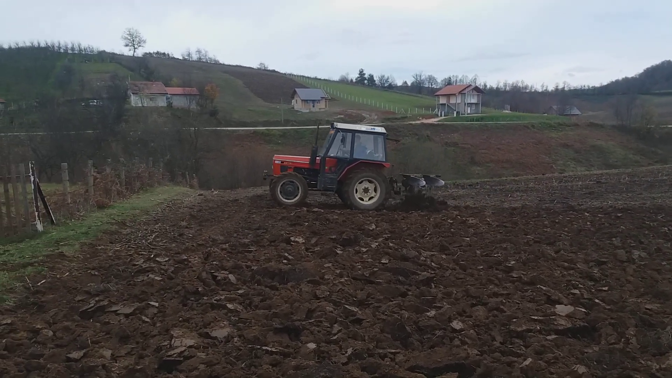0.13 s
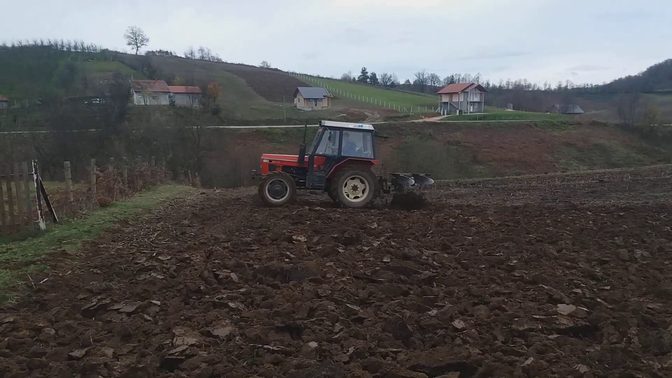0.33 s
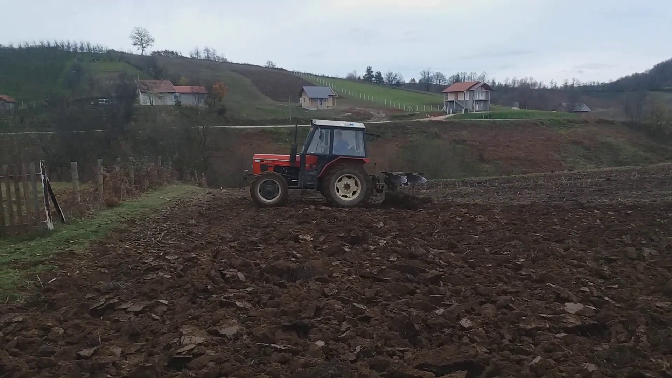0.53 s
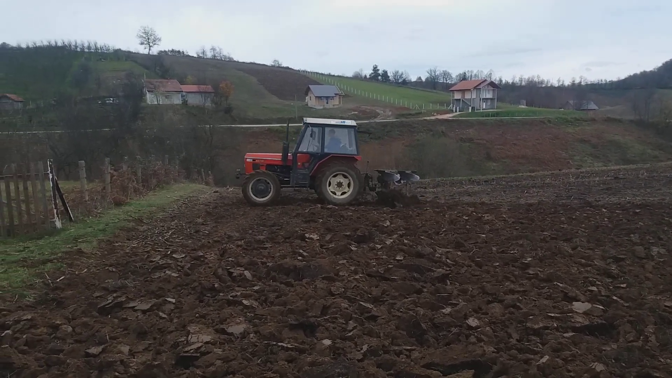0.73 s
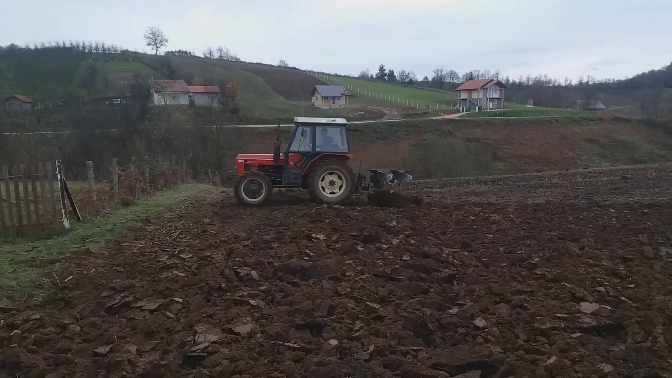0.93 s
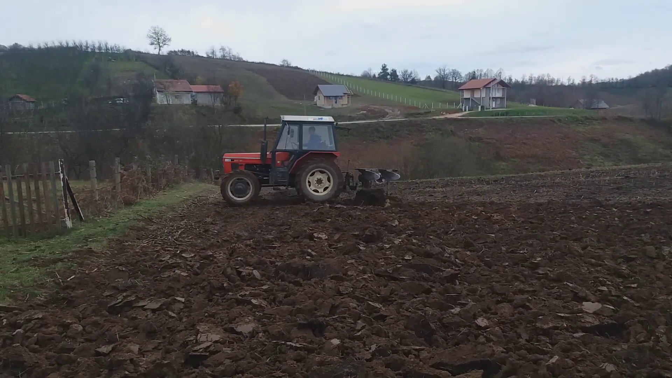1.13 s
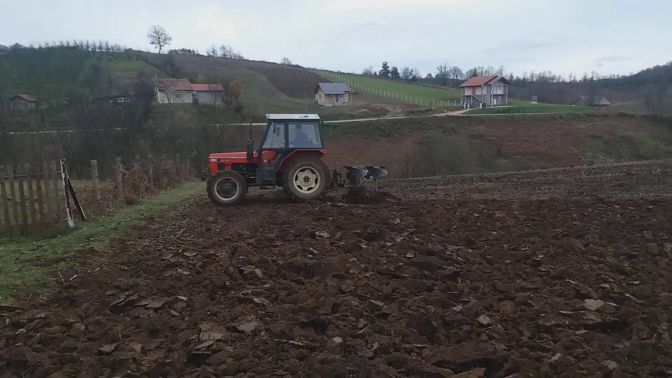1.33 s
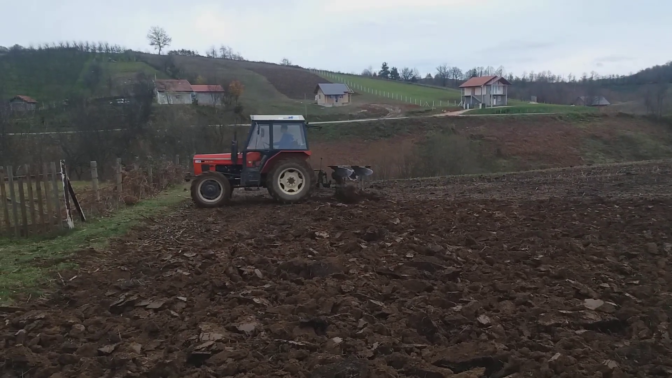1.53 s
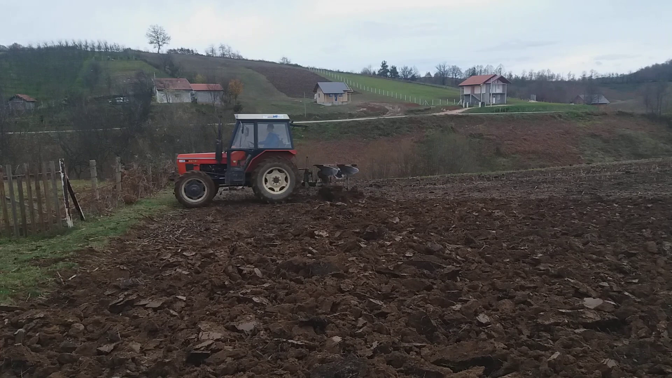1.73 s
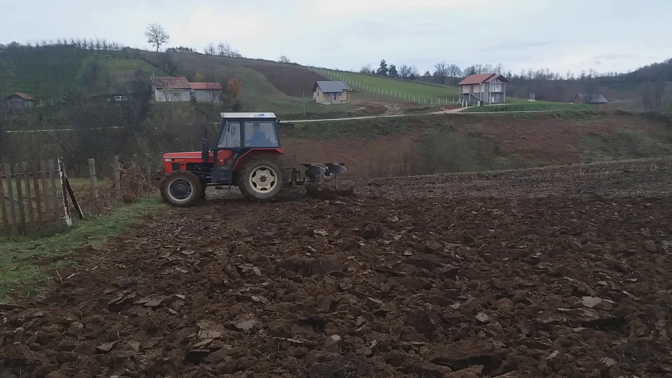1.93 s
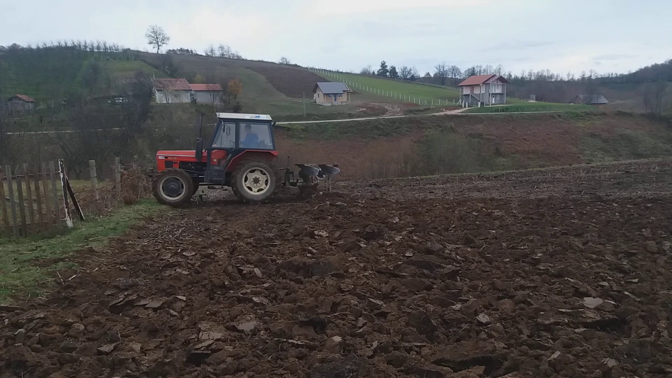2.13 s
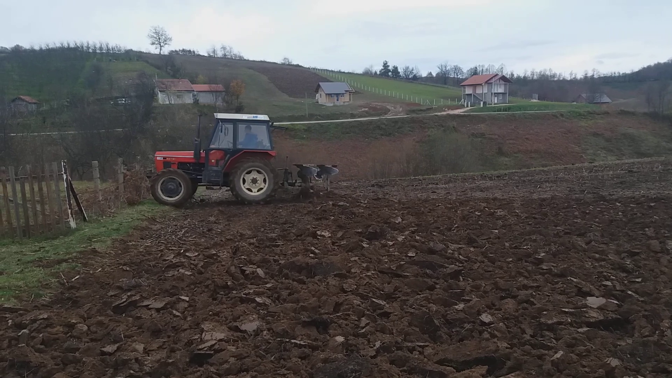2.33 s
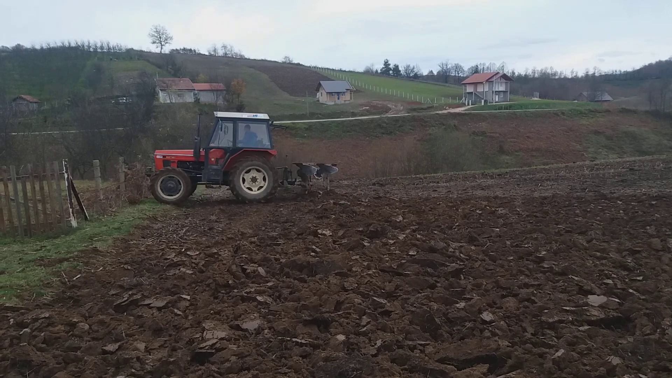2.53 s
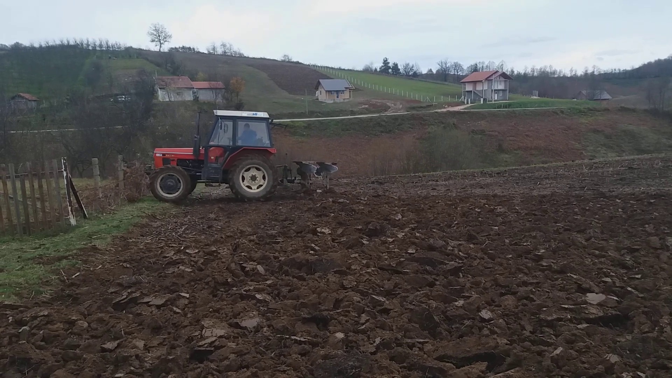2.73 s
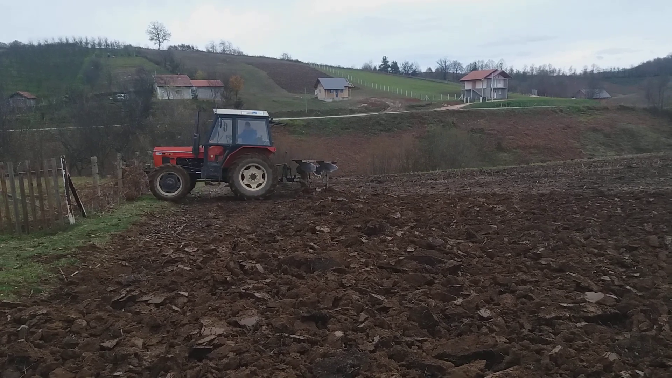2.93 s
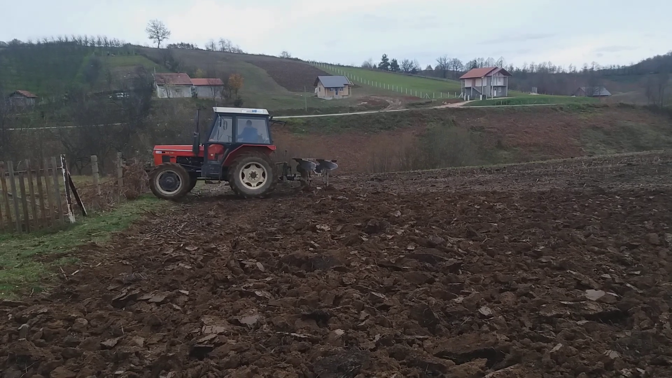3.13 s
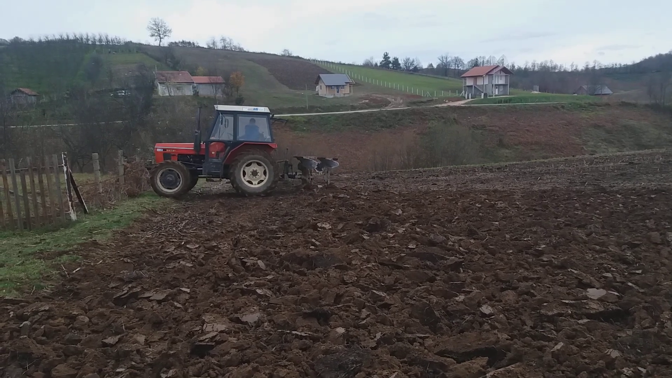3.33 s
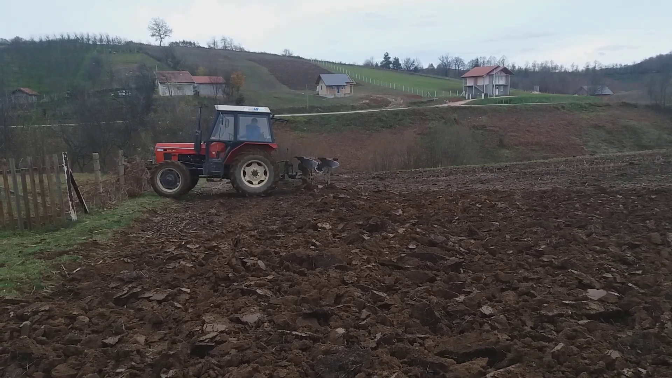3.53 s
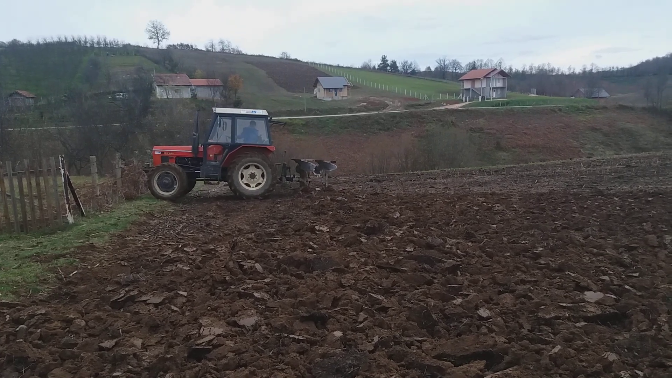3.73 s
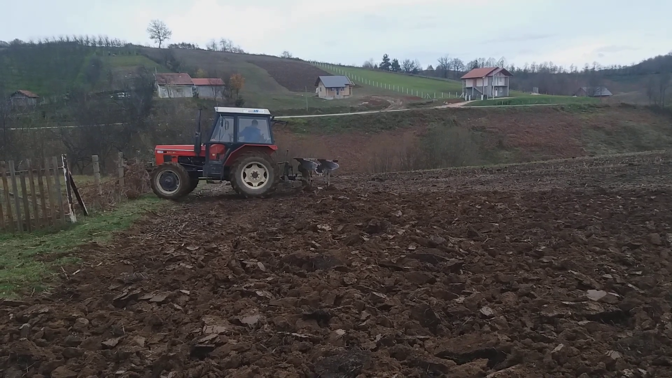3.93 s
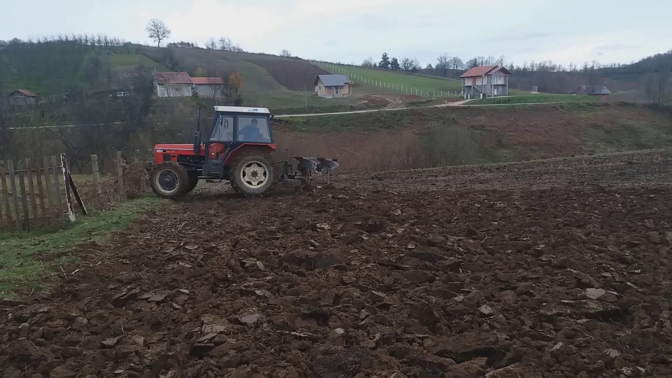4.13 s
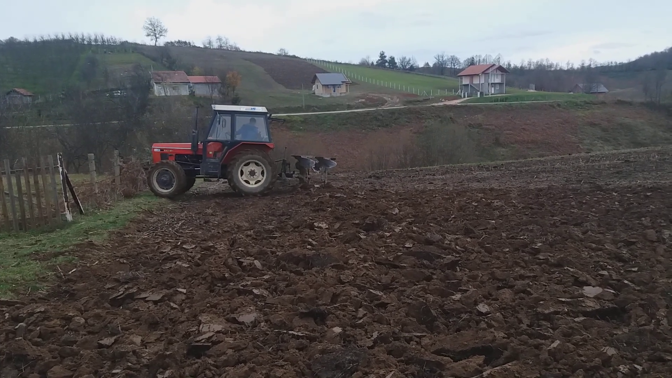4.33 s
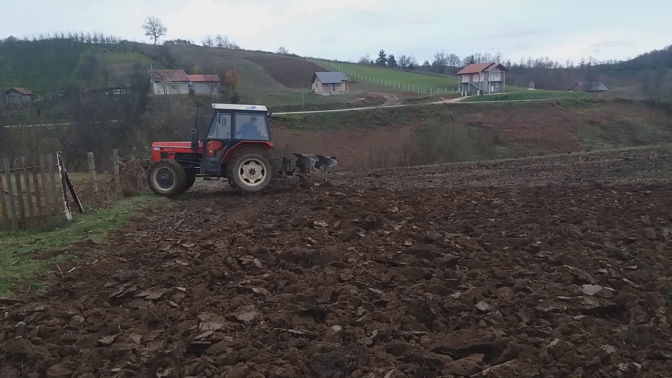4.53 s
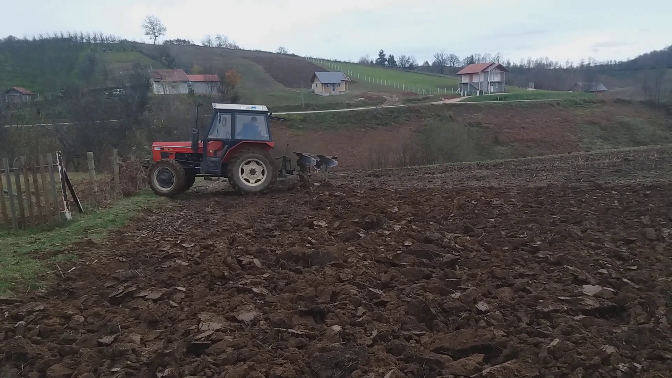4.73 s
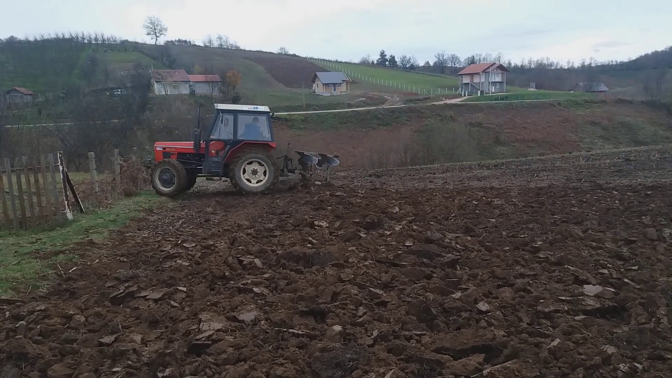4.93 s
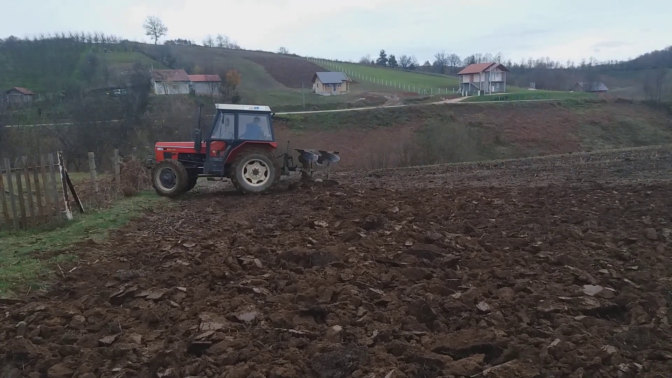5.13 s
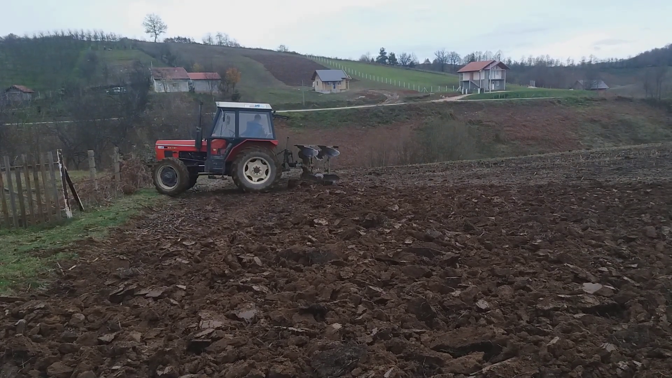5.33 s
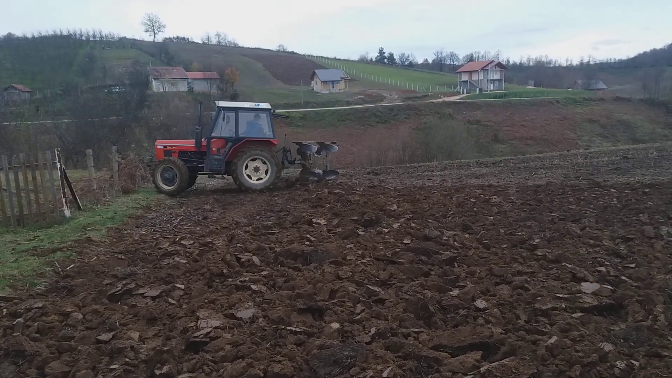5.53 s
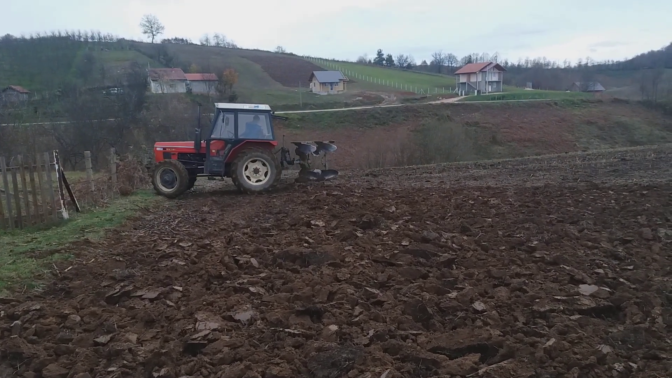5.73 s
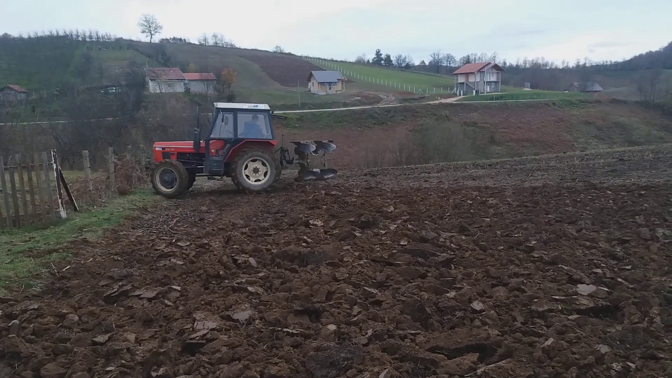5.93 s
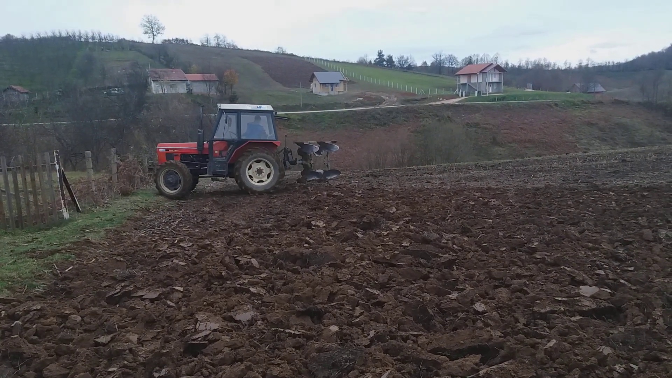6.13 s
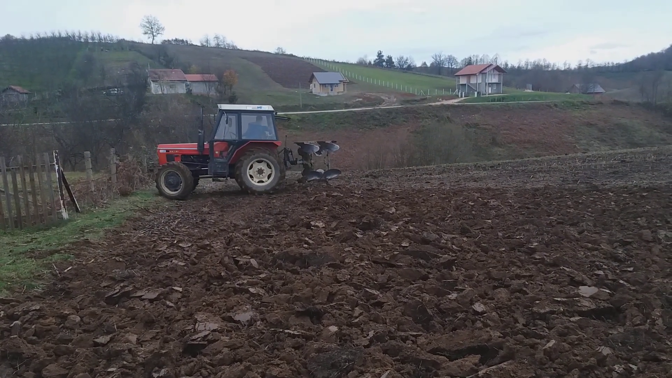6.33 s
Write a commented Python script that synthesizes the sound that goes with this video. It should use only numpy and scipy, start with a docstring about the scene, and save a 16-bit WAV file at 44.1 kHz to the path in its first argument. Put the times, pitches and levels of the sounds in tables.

```python
"""A four-cylinder diesel tractor pulls under load at the end of a furrow, humming and knocking in an open field.
The driver lifts off, the engine runs down to idle and is then revved again.
Sines locked to the crankshaft make the exhaust hum, over a low noise rumble. Knocks, valves and gears excite
resonances of the block. Shaped noise gives the hiss on top; soft thumps and a dry double tick come from the linkage."""
import sys
import numpy as np
from scipy import signal
from scipy.fft import rfft, irfft
from scipy.io import wavfile

SR = 44100
rng = np.random.default_rng(int(sys.argv[2]) if len(sys.argv) > 2 else 0)


def dump_mix(stems):
    """Bounce the given channels to the path in sys.argv[1] as a 16-bit WAV at rate SR."""
    frames = np.atleast_2d(stems).T  # one column per channel
    limited = np.clip(frames, -1, 1)  # hard clip at full scale
    pcm = np.round(limited * 32767).astype(np.int16)
    wavfile.write(sys.argv[1], SR, pcm)


def invert_db(x):
    """Field ratio 10**(x/20) for x, a level in decibels (scalar or array-like)."""
    u = np.asarray(x, float) / 20
    return 10 ** u


N = 282240   # samples, 6.4 s

# Crankshaft speed: t/s, f/Hz (firings per second)
SPEED = [(0.0, 62.35), (0.2, 60.91), (0.4, 61.24), (0.7, 60.21), (1.18, 61.25), (1.29, 62.63),
         (1.59, 63.47), (1.76, 58.06), (2.1, 52.3), (3.3, 37.29), (3.75, 31.39), (4.1, 27.79),
         (4.38, 25.71), (4.48, 27.56), (4.96, 47.37), (5.15, 49.6), (5.35, 49.48), (5.6, 50.54),
         (6.05, 52.14), (6.4, 52.86)]
# Fuel delivered: t/s, share of full (0-1)
FUEL = [(0, 0.77), (.8, 0.94), (1.3, 0.87), (1.6, 0.71), (1.68, 0.15), (3.0, 0.45), (3.3, 0.03),
        (4.1, 0.14), (4.36, 0.72), (4.42, 0.75), (5.02, 0.72), (5.14, 0.3), (5.7, 0.28), (6.0, 0.27),
        (6.4, 0.04)]
# Gear and valve clatter, which other engine noises follow: t/s, relative level/dB
CLATTER = [(0, -24.5), (0.15, -26.5), (0.55, -25.5), (1.3, -24.5), (1.6, -26), (1.68, -31), (2.6, -33.5),
           (3.4, -39), (4.1, -41.5), (4.38, -42), (4.5, -35), (4.8, -29.5), (5.02, -29), (5.12, -33),
           (5.35, -33.5), (5.72, -32), (6.4, -32.5)]

# Exhaust hum: t/s, firing order level/dB, second order level/dB
EXHAUST = [(0.0, -26.5, -40), (0.5, -27, -33), (1.3, -24.5, -31), (1.6, -26, -30.5), (1.7, -36, -35),
           (2.2, -57, -31.5), (3.4, -68, -37.5), (3.6, -74, -42), (4.15, -85, -60), (4.35, -84, -59),
           (4.58, -73, -37.5), (4.8, -50, -36.5), (5.0, -35, -29), (5.2, -44, -39), (5.35, -50, -37.5),
           (5.65, -41, -39.5), (6.4, -41, -35)]
# Third order, set by where it falls on the pipe's resonances: f/Hz, level/dB
THIRD_ORDER = [(78, -44), (95, -41.5), (108, -37.5), (130, -48), (145, -51), (155, -49.5), (185, -42)]
# Weaker orders from uneven cylinders: multiple of the four-firing cycle,
# relative level/dB on full fuel, relative level/dB coasting
UNEVEN_ORDERS = [(5, 1, -70), (6, -6, -3), (7, -4, -15), (9, -16, -14), (10, -10.5, -16), (11, -18, -3),
                 (13, -22, -7.5), (14, -13.5, -20), (15, -6.5, -13.5), (16, -7, -12), (17, -35, -11),
                 (18, -10, -9.5), (19, -8, -13), (20, -3.5, -16), (21, -42, -23), (22, -14, -13.5),
                 (23, -27, -12), (24, -14, -12.5), (26, -7, -27), (28, -23, -11.5), (33, -15.5, -16),
                 (34, -37, -29), (35, -26, -20), (40, -12, -33), (43, -15, -26), (44, -5, -43),
                 (52, -30, -19.5)]
# Bodywork and ground colouring the weaker orders: f/Hz, gain/dB
HUM_COLOUR = [(30, -27), (60, -16), (110, -0.5), (160, -4.5), (230, 1), (310, 1), (400, -3), (480, 1.5),
              (670, 4)]
# Shape of the rumble noise: f/Hz, relative level/dB per Hz
RUMBLE_SPECTRUM = [(18, -53), (30, -33), (43, -45), (67, -10.5), (87, -9), (110, 4), (155, -16), (276, 3.5),
                   (485, -11), (600, -19.5), (780, -57), (1320, -120)]

# Resonances of block and panels: f/Hz, width/Hz, then relative level/dB when knocked,
# under clatter, and when valves seat
BLOCK_MODES = [(617, 256, 4, -21.5, -19), (666.6, 33, 3.5, -24.5, -17.5), (765.7, 13.5, 2, -13.5, -22),
               (845, 400, -2.5, -8.5, -10), (963, 223, -18.5, -15, -8), (1089, 142, -13, -18.5, -6),
               (1208, 260, -27.5, -14.5, -9.5), (1580, 230, 6.5, -20.5, -8.5), (1738, 144, 5, -13.5, -19),
               (1893, 390, -53, -13, -14.5), (2322, 223, 11.5, -13.5, -11.5), (2500, 195, -1.5, -13, -7),
               (2606, 225, 7, -12.5, -32), (2817, 136, 9, -20, -58), (3062, 188, 10.5, -13.5, -16.5),
               (3300, 230, -6.5, -12.5, -41), (3620, 380, -2, -19, -19), (4085, 300, 5, -38, -40),
               (4464, 410, 0, -25.5, -34), (4910, 500, -3, -29.5, -35), (5330, 180, -11, -31.5, -31),
               (5740, 360, -27, -30.5, -31)]
# Knock strength of each cylinder in firing order: relative level/dB
CYLINDER_DB = [-7, -10, -5, -6]
# Valve seating strength of each cylinder in firing order: relative level/dB
VALVE_DB = [-4.0, -1.0, -4.0, 0.5]
# How hard the valves seat against the clatter: t/s, relative level/dB
SEATING = [(0, 0), (1.6, 1.5), (1.8, -4.5), (2.8, -3.5), (4.3, 3.5), (4.7, 2), (5.1, 4), (5.9, 5),
           (6.4, 5.5)]
# Hardest knocks, each ringing the block around one pitch: t/s, relative level/dB, f/Hz
HARD_KNOCKS = [(0.4976, -9, 2820), (0.5611, -8, 2800), (0.6302, -8, 3170), (0.6826, -9, 2370),
               (0.7608, -3, 2560), (0.8104, -2, 2710), (0.8777, -3, 2850), (0.964, -5, 3000),
               (1.073, -6.5, 2280), (1.2058, -8, 2500), (1.222, -1, 3060), (1.27, -3.5, 2900),
               (1.2852, -1.5, 2940), (1.352, -7, 3060), (1.508, -6, 2440), (2.3347, -13.5, 1740),
               (2.4965, -20.5, 3070), (4.409, -19.5, 2480), (4.4493, -19, 3550), (4.522, -14, 2350),
               (4.5875, -15, 2440), (4.6195, -17, 2500), (4.6734, -11.5, 3020), (4.7817, -10.5, 3060),
               (4.8533, -11, 1710), (4.8787, -8, 1720), (4.9667, -13, 1600), (5.006, -12, 1580),
               (5.6897, -8, 990), (5.765, -9, 1000), (5.84, -23, 2500)]

# Treble hiss: t/s, relative level/dB
HISS_LEVEL = [(0, -46), (.75, -42), (1.3, -42.5), (1.6, -53), (1.75, -53), (2.85, -51), (3.1, -64),
              (4.4, -61.5), (4.5, -50.5), (5.3, -46.5), (6.4, -45)]
# Shape of the steady hiss: f/Hz, relative level/dB per Hz
HISS_SPECTRUM = [(4500, -8), (5500, -5.5), (6300, -3.5), (7200, -7.5), (8100, -16.5), (8800, -12),
                 (9700, 1), (10500, 1.5), (11000, -2.5), (12100, -7), (13400, -17), (14200, -17),
                 (15000, -5.5), (15700, -7.5)]
# Whining bands in the hiss: f/Hz, width/Hz, relative level/dB
WHINE_BANDS = [(6670, 97, -14), (10430, 260, -7), (12340, 70, -16)]
# Shape of the spit at each firing: f/Hz, relative level/dB per Hz
SPIT_SPECTRUM = [(4500, -8.5), (6300, -4.5), (8100, -14.5), (9700, 1.5), (11000, -1.5), (13400, -11),
                 (15000, -7), (15700, -6)]

# Low thumps as the linkage takes up load: t/s, relative level/dB, f/Hz
THUMPS = [(4.167, -31, 106), (5.094, -19.5, 151)]
# Dry double tick: t/s, relative level/dB
DOUBLE_TICK = [(5.7698, -26), (5.7764, -26)]
# Shape of the tick noise: f/Hz, relative level/dB per Hz
TICK_SPECTRUM = [(3500, -30), (4600, 2), (6500, -2), (8000, -20), (10500, 2), (13500, -9), (15000, -20)]
# Shape of the microphone's own hiss: f/Hz, relative level/dB per Hz
MICROPHONE_HISS = [(5000, -25), (9000, -8), (12500, 0), (15700, 0)]

START_FIRINGS = 0.55   # firings elapsed at time zero
PIPE_S, PIPE_FIRINGS = 0.011, 0.52   # exhaust against knock: travel time, crank angle in firings
KNOCK_DB, KNOCK_DB_ON_FULL_FUEL = -21, 17   # base against the clatter, and what full fuel adds
KNOCK_SCATTER_DB = 1.45   # from firing to firing, shared by all resonances
RUMBLE_DB, CLATTER_MEAN_DB = -38, -33   # base of the rumble, at this clatter level
RUMBLE_FOLLOWS = 0.73   # share of the clatter's swing in dB


def in_time(rows):
    """Turn the columns of a table into curves over all samples."""
    seconds, *columns = np.transpose(rows)
    return [np.interp(np.arange(N) / SR, seconds, column) for column in columns]


def rms_one(x):
    """Scale a sound to an rms of 1."""
    return x / np.sqrt(np.mean(x ** 2) + 1e-20)


def tinted(x, spectrum):
    """Colour a sound by changing its level at each frequency."""
    hz, db = np.transpose(spectrum)
    bins_hz = np.arange(N // 2 + 1) * SR / N + 1   # 1 Hz up, so the logarithm exists
    gain_db = np.interp(np.log(bins_hz), np.log(hz), db)
    return irfft(rfft(x) * invert_db(gain_db), N)


def coloured(spectrum):
    """Make noise of rms 1 with the given spectrum."""
    return rms_one(tinted(rng.standard_normal(N), spectrum))


def drift(rate_hz, count):
    """Make slow random curves of spread 1 by smoothing noise twice."""
    pole = np.exp(-80 * np.pi * rate_hz / SR)   # one point every 40 samples
    noise = rng.standard_normal((count, N // 40 + 2002))
    slow = signal.lfilter([1], [1, -2 * pole, pole * pole], noise)[:, 2000:]   # skip the filter's start
    return [np.interp(np.arange(N) / 40, np.arange(len(s)), rms_one(s)) for s in slow]


def burst(at, db, rise_s, fall_s):
    """Make an envelope that rises and dies away after each marked sample."""
    marks = np.zeros(N)
    np.add.at(marks, at, invert_db(db))
    rise, fall = np.exp(-1 / (rise_s * SR)), np.exp(-1 / (fall_s * SR))
    return signal.lfilter([1 - rise], np.convolve([1, -rise], [1, -fall]), marks + 1e-18)


def resonance(x, hz, width_hz):
    """Ring at one pitch; filtering twice darkens the gaps, and unit noise comes out near rms 1."""
    r = np.exp(-np.pi * width_hz / SR)
    row = [1 - r, 0, r - 1, 1, -2 * r * np.cos(2 * np.pi * hz / SR), r * r]
    return signal.sosfilt([row, row], x) * np.sqrt(SR / width_hz)


def blows(at, db, scatter_db, click_db, rise_s, fall_s):
    """Make each blow a click and a weaker rebound, loosely timed, with a short noise burst around them."""
    luck = rng.standard_normal((len(at), 5))
    db = db + scatter_db * luck[:, 0]
    out = burst(at, db, rise_s, fall_s) * rng.standard_normal(N)
    for column, after_s, drop_db in [(1, rise_s, 0), (3, rise_s + 0.003, 3.5)]:
        late = (SR * (after_s + 0.0008 * luck[:, column])).astype(int)
        sign = np.sign(luck[:, column + 1])
        np.add.at(out, np.clip(at + late, 0, N - 1), invert_db(db + click_db - drop_db) * sign)
    return out


def exhaust(firings, per_s, rumble_db, fuel):
    """Hum with sines locked to the crank: three strong orders, and weak ones that waver."""
    turns = 2 * np.pi * (firings - PIPE_S * per_s + PIPE_FIRINGS)
    third_db = np.interp(3 * per_s, *np.transpose(THIRD_ORDER))
    strong = 0
    for order, db in enumerate(in_time(EXHAUST) + [third_db], 1):
        strong = strong + invert_db(db) * np.cos(order * turns)
    wavers = drift(4.5, count=len(UNEVEN_ORDERS))
    phases = rng.uniform(0, 2 * np.pi, len(UNEVEN_ORDERS))
    waver_db = 4.5 - 3.0 * fuel   # steadier under load
    weak = 0
    for (multiple, full_db, coast_db), waver, phase in zip(UNEVEN_ORDERS, wavers, phases):
        db = rumble_db + coast_db + fuel * (full_db - coast_db) + waver_db * waver
        weak = weak + invert_db(db) * np.cos(round(multiple) * turns / 4 + phase)   # four firings a cycle
    return np.sqrt(2) * (strong + tinted(weak, HUM_COLOUR))   # a sine's peak is root 2 times its rms


def rumble(rumble_db, fuel):
    """Rumble with low noise whose level follows the clatter and eases as fuel rises."""
    return invert_db(rumble_db - 4.0 - 1.7 * fuel) * coloured(RUMBLE_SPECTRUM)


def block(at, cylinder, knock_db, clatter_db, fuel):
    """Strike every resonance at each firing and valve seating, with gears rattling under it."""
    hard_s, hard_db, hard_hz = np.transpose(HARD_KNOCKS)
    hard_at = (hard_s * SR).astype(int)
    luck_db = KNOCK_SCATTER_DB * rng.standard_normal(len(at))
    firing_db = knock_db[at] + np.array(CYLINDER_DB)[cylinder] + luck_db
    valve_db = clatter_db + in_time(SEATING)[0]
    seat_db = valve_db[at] + np.array(VALVE_DB)[cylinder]
    seat_at = np.maximum(at - round(0.001965 * SR), 0)   # a little ahead of the knock
    flickers = drift(10.4, count=len(BLOCK_MODES))
    out = 0
    for (hz, width_hz, knocked_db, rattled_db, seated_db), flicker in zip(BLOCK_MODES, flickers):
        force = blows(at, firing_db + knocked_db - 1.5, 1.2, 19, 0.0025, 0.0055)
        off_pitch_db = 60 * np.abs(np.log2(hz / hard_hz))   # 60 dB weaker per octave away
        force += blows(hard_at, hard_db - 16.0 - off_pitch_db, 0.27, 20.0, 0.001212, 0.0047)
        force += blows(seat_at, seat_db + seated_db, 1.5, 19, 0.003, 0.006)
        gears = invert_db(clatter_db + rattled_db - 4.0 * fuel)   # load takes the slack out of the gears
        rockers = invert_db(valve_db + seated_db - 10)   # the valve gear also chatters between seatings
        force += np.hypot(gears, rockers) * invert_db(1.03 * flicker) * rng.standard_normal(N)
        out = out + resonance(force, hz, width_hz)
    return out


def hiss(at, clatter_db, hiss_db):
    """Hiss with bright noise and faint whining bands that come and go, plus a spit at every firing."""
    steady = coloured(HISS_SPECTRUM) * invert_db(2.7 * drift(23, count=1)[0] - 2.5)
    for (hz, width_hz, db), flicker in zip(WHINE_BANDS, drift(3.8, count=len(WHINE_BANDS))):
        steady += resonance(invert_db(db - 8 + 5.0 * flicker) * rng.standard_normal(N), hz, width_hz)
    spit_db = clatter_db[at] - 13 + 1.5 * rng.standard_normal(len(at))
    spits = burst(at, spit_db, 0.0022, 0.008) * coloured(SPIT_SPECTRUM)
    return invert_db(hiss_db) * steady + spits


def linkage():
    """Thump with short low sines that swell and die, and tick with two tiny noise bursts."""
    tick_s, tick_db = np.transpose(DOUBLE_TICK)
    tick_at = np.round(tick_s * SR).astype(int)
    out = coloured(TICK_SPECTRUM) * burst(tick_at, tick_db - 4, 0.0003, 0.0013)
    for start_s, db, hz in THUMPS:
        cycles = np.maximum(np.arange(N) / SR - start_s, 0) * hz
        swell = cycles * np.exp(-cycles / 0.96)
        out += invert_db(db + 7.5) * swell * np.sin(2 * np.pi * cycles)
    return out


def scene():
    """Add up the tractor's sounds, driven by one crankshaft and heard from one point in the open."""
    per_s = in_time(SPEED)[0]
    firings = START_FIRINGS + np.cumsum(per_s) / SR
    at = np.flatnonzero(np.diff(np.floor(firings)))   # a firing at each whole count
    cylinder = firings[at + 1].astype(int) % len(CYLINDER_DB)
    clatter_db = in_time(CLATTER)[0]
    fuel = np.clip(in_time(FUEL)[0], 0, 1)
    knock_db = clatter_db + KNOCK_DB + KNOCK_DB_ON_FULL_FUEL * fuel
    rumble_db = RUMBLE_DB + RUMBLE_FOLLOWS * (clatter_db - CLATTER_MEAN_DB)
    mix = exhaust(firings, per_s, rumble_db, fuel)
    mix = mix + rumble(rumble_db, fuel)
    mix = mix + block(at, cylinder, knock_db, clatter_db, fuel)
    mix = mix + hiss(at, clatter_db, in_time(HISS_LEVEL)[0])
    mix = mix + linkage()
    return mix[None]   # one channel


def top_cut(x):
    """Nothing passes above about 16.8 kHz."""
    return signal.sosfilt(signal.butter(12, 16830, fs=SR, output="sos"), x)


def record(dry):
    """Add the microphone's faint hiss, round off the hardest peaks and cut the top steeply."""
    heard = dry + invert_db(-70) * coloured(MICROPHONE_HISS)
    rounded = heard / (1 + (heard / 0.62) ** 4) ** 0.25   # peaks stay below 0.62
    steep_cut = signal.ellip(12, 0.5, 70, 15760, fs=SR, output="sos")   # ripple/dB, depth/dB, edge/Hz
    finished = signal.sosfilt(steep_cut, rounded)
    return top_cut(finished)


dry = scene()
out = record(dry)
dump_mix(out)
```